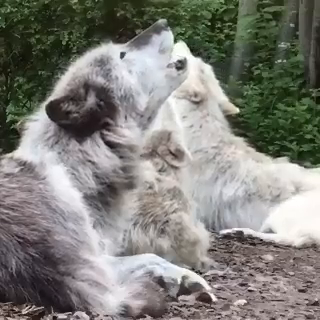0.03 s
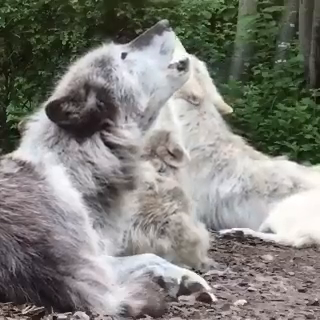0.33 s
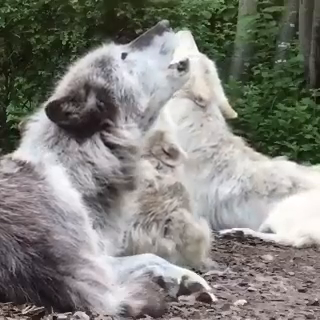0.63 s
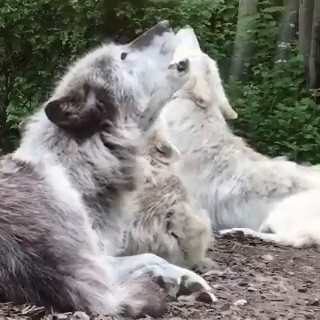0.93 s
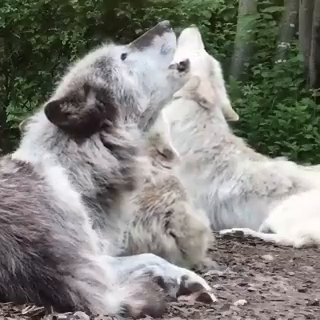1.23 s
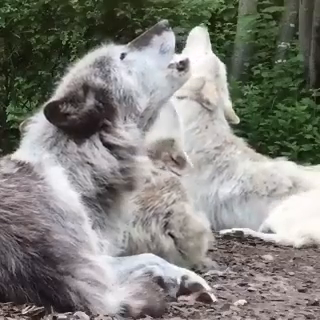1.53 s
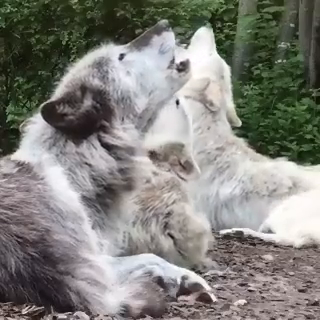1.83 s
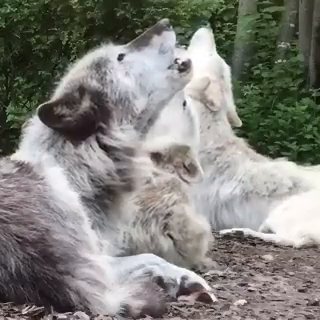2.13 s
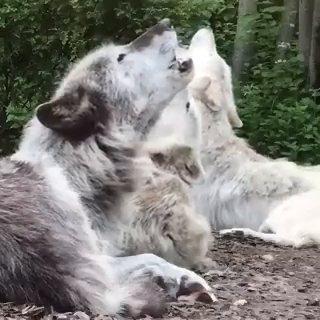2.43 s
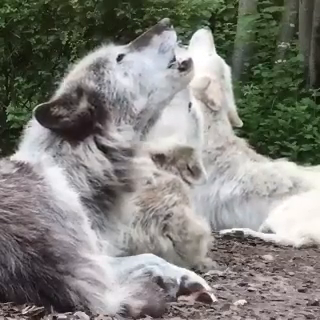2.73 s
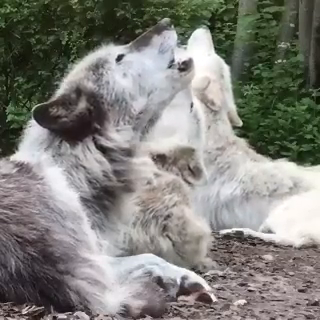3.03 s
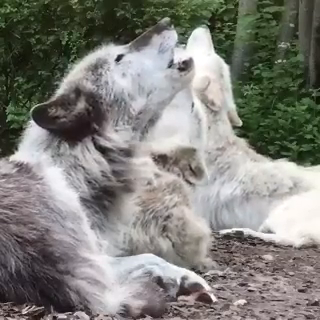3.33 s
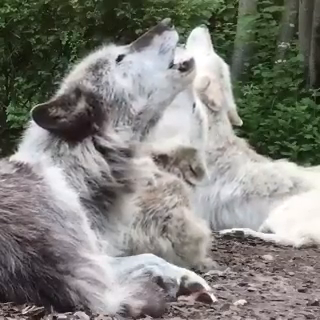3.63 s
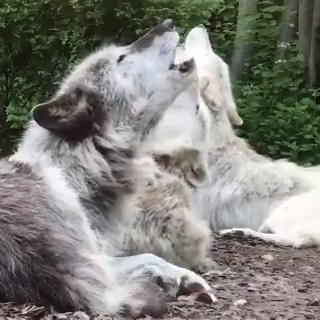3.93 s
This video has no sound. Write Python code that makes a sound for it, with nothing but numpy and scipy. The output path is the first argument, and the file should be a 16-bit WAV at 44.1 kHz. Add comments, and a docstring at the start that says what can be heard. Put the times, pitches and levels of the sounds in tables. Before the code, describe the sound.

Wolves howl together in long overlapping notes, with faint birds in the forest behind.

```python
"""Three wolves howl at a forest edge. From the start one holds a middle note; a second is hoarse, its vocal
folds repeating every third cycle, and breaks into a thin high note at 0.6 s. At 1.3 s the nearest joins
with a rough yelp, gets loud enough to clip and slides down. From 2.7 s a faint fourth howl echoes from
the trees. Behind them: forest air, soft ground bumps at 0.4 and 3.2 s, and far birds from 1 s on."""
import sys
import numpy as np
from scipy import signal
from scipy.fft import rfft, irfft
from scipy.io import wavfile
from scipy.ndimage import uniform_filter1d

SR = 44100
rng = np.random.default_rng(int(sys.argv[2]) if len(sys.argv) > 2 else 0)


def to_wav(sig):
    """Store sig (one row per channel, or 1-D mono) as 16-bit WAV at the path in sys.argv[1].

    Samples outside -1..1 are clipped; the rate is SR.
    """
    pcm = np.clip(np.atleast_2d(sig), -1, 1) * 32767
    pcm = np.round(pcm).astype(np.int16)
    wavfile.write(sys.argv[1], SR, pcm.T)  # frames by channels


N = 176400
TIME = np.arange(N) / SR
TREBLE_EDGE_HZ = 9700


def amp(db):
    """Decibels to gain."""
    return 10 ** (np.asarray(db) / 20)


def unit(x):
    """Scale to rms 1."""
    return x / np.sqrt(np.mean(x ** 2) + 1e-20)


def curves(table):
    """Timed points to one smooth curve per value column."""
    times_s, *columns = np.transpose(table)
    return [uniform_filter1d(np.interp(TIME, times_s, c), size=500) for c in columns]


def colour(points, hz):
    """Interpolate over log frequency."""
    points_hz, values = np.transpose(points)
    return np.interp(np.log(hz + 1), np.log(points_hz), values)


def noise(gain):
    """Noise of rms 1, spectrum shaped by gain(hz)."""
    return unit(irfft(rfft(rng.standard_normal(N)) * gain(np.fft.rfftfreq(N, 1 / SR)), N))


def drift(rate_hz):
    """Random wander, rms 1, rolling off above rate_hz."""
    return noise(lambda hz: 1 / (1 + (hz / rate_hz) ** 2))


def burst(peak_s, length_s, centre_hz, width_hz, db):
    """Short swell of noise in one resonance."""
    swell = np.exp(-np.abs(2 * (TIME - peak_s) / length_s) ** 3)
    return amp(db) * swell * noise(lambda hz: 1 / (1 + (2 * (hz - centre_hz) / width_hz) ** 2 / 2) ** 2)


def whistle(hz, db, jitter):
    """One slightly unsteady partial."""
    return np.sqrt(2) * amp(db) * np.sin(2 * np.pi * np.cumsum(hz * (1 + jitter * drift(64))) / SR)


def low_pass(x, hz):
    """Steep band limit."""
    return signal.oaconvolve(x, signal.firwin(401, hz, window=("kaiser", 8), fs=SR)[None], "same")


def forest_air():
    """Steady, dull background noise."""
    # (frequency [Hz], relative density [dB])
    spectrum = [(20,-33.5),(48,-18.5),(70,-3.5),(105,4.5),(150,3.5),(220,-1),(400,-5.5),(900,7.5),(1500,-2.5),(2200,-17),(3500,-16),(4700,-27.5),(6000,-27.5),(7500,-31)]
    return amp(-39.5) * noise(lambda hz: amp(colour(spectrum, hz)))


def forest_echo(x, taps_per_s=1500, gap_s=.012):
    """Scattered echoes from trunks, each band dying at its own rate."""
    # (frequency [Hz], T60 [s])
    decay = [(200,0.97),(600,.9),(1500,0.89),(4000,0.37),(9000,0.93)]
    taps = rng.standard_normal(SR) * (rng.random(SR) < taps_per_s / SR) * (TIME[:SR] > gap_s)
    hz, age_s, bands = signal.stft(taps, SR, nperseg=256)
    fade = amp(-60 * age_s / colour(decay, hz)[:, None])
    tail = signal.istft(bands * fade, SR, nperseg=256)[1]
    return signal.fftconvolve(x, tail / np.linalg.norm(tail))[:N]


def birds():
    """Far chirps: short sine glides that warble and flicker."""
    # (start [s], length [s], start pitch [Hz], end pitch [Hz], relative level [dB])
    chirps = [(1.041,0.2,3570,3370,-49.5),(1.933,0.036,4913,5250,-47),(2.34,0.035,3203,2784,-42),(2.397,0.039,3500,2418,-40),(1.316,.04,5020,5400,-48.5),(2.837,0.03,4664,3580,-41.5),(2.857,0.034,3177,2833,-33.5),(2.893,0.15,3240,2966,-42),(3.018,0.06,3120,2470,-40),(3.076,0.036,4090,5100,-43.5),(3.105,0.048,2620,2845,-46),(3.126,0.12,6743,5800,-40.5),(3.42,0.048,2854,2790,-40),(3.547,0.1,3705,4194,-47),(3.737,0.047,2985,2858,-35.5),(3.741,0.098,4706,3596,-43.5),(3.855,0.027,2580,3372,-37.5),(3.865,0.14,3740,4310,-42)]
    song, warble = np.zeros(N), 1 + .018 * drift(120)
    for start_s, length_s, from_hz, to_hz, db in chirps:
        at = (TIME > start_s) & (TIME < start_s + length_s)
        progress = (TIME[at] - start_s) / length_s
        hz = (from_hz + (to_hz - from_hz) * progress) * warble[at]
        envelope = np.sqrt(2) * amp(db) * np.sin(np.pi * progress)
        song[at] += envelope * np.sin(2 * np.pi * np.cumsum(hz) / SR)
    flicker = unit(1 + .4 * drift(150))
    return song * flicker


def far_wolf():
    """Faint high howl: one sinking partial."""
    # (time [s], pitch [Hz], level [dB])
    contour = [(2.7,1268,-81.5),(2.93,1255,-35.5),(3.15,1238,-34.5),(3.45,1221,-40.5),(3.65,1146,-34),(4,1158,-42)]
    return whistle(*curves(contour), jitter=.009)


def ground_bumps():
    """Soft bumps and scuffs: low noise bursts."""
    # (peak time [s], length [s], centre [Hz], width [Hz], level [dB])
    bumps = [(0.386,0.2,260,142,-41.5),(3.21,0.036,231,255,-48)]
    return sum(burst(*row) for row in bumps)


def throat_rush(tones):
    """Air rushing through the throats, following the rms of the howls."""
    # (frequency [Hz], relative density [dB])
    spectrum = [(100,-36),(280,-13),(450,0.5),(750,-1.5),(1200,1.5),(1600,-10),(2100,-15),(3200,-22.5),(4800,-32),(9000,-46)]
    effort = np.sqrt(np.abs(uniform_filter1d(tones ** 2, size=2000)))
    return amp(-30.5) * effort * noise(lambda hz: amp(colour(spectrum, hz)))


def throat_rasps():
    """Rasp and hiss where a voice turns chaotic."""
    # (peak time [s], length [s], centre [Hz], width [Hz], level [dB])
    rasps = [(0.011,0.15,758,70.5,-13),(0.142,0.04,738,40,-15),(0.294,0.28,743,121.4,-38.5),(.25,0.63,5490,390,-55.5),(0.257,.75,3924,140,-53),(0.6,0.061,755,127.4,-28.5),(1.366,0.073,564.8,129.4,-12),(1.378,.1,726,121,-27),(1.362,0.071,418,90,-30),(1.37,0.089,1345,600,-29.5),(1.48,.3,1650,898,-37.5),(1.552,0.077,700,162.2,-17.5),(1.601,0.056,820.8,60.3,-21.5)]
    return sum(burst(*row) for row in rasps)


def howl(hz, db, octave_db, throat, jitter, shimmer, bright_db=0, hoarse=(), hoarse_colour=None):
    """Near-pure voice: (tone, overtones). When hoarse, the folds repeat only every few cycles."""
    phase = 2 * np.pi * (np.cumsum(hz * (1 + jitter * drift(45))) / SR + rng.random())
    tone, overtones = np.sin(phase), np.zeros(N)
    flutter_db, flutter_hz = 4, 6
    for k in range(2, 21):
        if k == 2:
            partial_db = octave_db
        else:
            partial_db = colour(throat, k * hz) + bright_db + flutter_db * drift(flutter_hz)
        partial = np.sin(k * phase + 2 * np.pi * rng.random())
        overtones += amp(partial_db) * (k * hz < TREBLE_EDGE_HZ) * partial
    for start_s, end_s, cycles, hoarse_db in hoarse:
        gate = amp(hoarse_db) * np.clip(np.minimum(TIME - start_s, end_s - TIME) / .03 + .5, 0, 1)
        at = gate > 0
        for k in range(1, 12):
            if k % cycles or k > 2 * cycles:  # subharmonic series, minus fundamental and octave
                partial = np.sin(k / cycles * phase[at] + 2 * np.pi * rng.random())
                tone[at] += gate[at] * amp(colour(hoarse_colour, hz[at] * k / cycles)) * partial
    return np.sqrt(2) * amp(db) * (1 + shimmer * drift(35)) * np.array([tone, overtones])


def steady_wolf():
    """Clean middle note that steps up near 1.7 s."""
    # (time [s], pitch [Hz])
    pitch = [(0,566.7),(.15,551.5),(.5,527.7),(.7,508),(.97,509.4),(1.12,518.3),(1.33,520.5),(1.45,513),(1.56,511),(1.68,545.5),(1.85,630),(2.04,649.5),(2.1,677),(2.16,650),(2.36,647),(2.57,600.5),(2.66,610.7),(3.06,550.5),(3.15,553.4),(3.35,599.4),(3.56,588),(3.76,611.5),(3.89,608),(4,595)]
    # (time [s], level [dB], octave [dB re fundamental])
    level = [(0,-16,-17),(.2,-17.5,-19),(.5,-15.5,-26),(.8,-17.5,-20),(1.3,-16,-23),(1.5,-18.5,-24),(1.65,-23,-9),(1.78,-29,-11.5),(1.83,-19.5,-27.5),(2.1,-17,-37.5),(2.4,-19.5,-29),(2.8,-18,-22.5),(3.1,-20,-12),(3.4,-18.5,-23.5),(3.65,-19.5,-15.5),(3.8,-21.5,-22),(4,-20,-25)]
    # upper partials (frequency [Hz], level [dB re fundamental])
    throat = [(1600,-45.5),(2700,-60.5),(3500,-47.5),(3700,-35.5),(3950,-41),(4800,-75.5),(5500,-50),(6200,-65.5),(9200,-72)]
    return howl(*curves(pitch), *curves(level), throat, jitter=.0025, shimmer=.075)


def high_wolf():
    """Hoarse note breaking upward into a thin, wavering one; brighter as pitch rises."""
    # (time [s], pitch [Hz])
    pitch = [(0,704),(.33,660.4),(.48,661),(.595,700),(.65,870),(.71,872),(.78,933),(.905,975),(1.02,964),(1.11,992.5),(1.36,1002),(1.59,972),(1.74,1051),(1.87,1050),(2.04,995),(2.26,954),(2.33,1018),(2.46,956.6),(2.76,919),(3.08,932),(3.46,987),(3.59,947),(3.86,951.5),(3.97,861)]
    # (time [s], level [dB])
    level = [(0,-20.5),(.3,-22.5),(.52,-23),(.585,-16),(.64,-26.5),(.73,-30.5),(.82,-26.5),(1.15,-24.5),(1.6,-23.5),(1.85,-24.5),(1.95,-24),(2.05,-26),(2.24,-27.5),(2.33,-24.5),(2.55,-28),(2.65,-22),(2.76,-27.5),(3.2,-24.5),(3.55,-25.5),(3.85,-22),(4,-28.5)]
    # overtones (frequency [Hz], relative level [dB])
    throat = [(1300,-34),(2000,-52),(2900,-39.5),(3800,-32.5),(4800,-55.5),(5700,-39.5),(6700,-61),(9200,-64.5)]
    # (start [s], end [s], repeat [cycles], relative level [dB])
    hoarse = [(-.1, .59, 3, 0)]
    # subharmonic series (frequency [Hz], gain [dB])
    hoarse_colour = [(220,-42.5),(440,0),(880,-21.5),(1100,-15.5),(1500,-32),(3000,-50.5)]
    hz, = curves(pitch)
    octave_db = colour(throat, 2 * hz)
    bright_db = 18 * np.log2(hz / np.median(hz))
    return howl(hz, *curves(level), octave_db, throat, jitter=.0045, shimmer=.19,
                bright_db=bright_db, hoarse=hoarse, hoarse_colour=hoarse_colour)


def near_wolf():
    """Hoarse yelp clearing into a loud nasal howl; mellower as pitch falls."""
    # (time [s], pitch [Hz])
    pitch = [(1.3,586),(1.35,564.2),(1.385,651.3),(1.415,626.3),(1.49,588.2),(1.55,611),(1.61,591.3),(1.64,577.2),(1.79,567.4),(1.95,516.9),(2.04,496.2),(2.12,499.7),(2.25,474),(2.35,471.3),(2.49,451.6),(2.66,455.4),(2.78,449.2),(2.97,426.3),(3.25,422),(3.56,409.4),(3.72,415.3),(4,427)]
    # (time [s], level before beats [dB], octave [dB re fundamental])
    level = [(1.285,-66.5,-36),(1.305,-15,-34),(1.35,-10,-23.5),(1.39,-19,-21),(1.43,-10.5,-14.5),(1.51,-8,-17.5),(1.53,-7,-28.5),(1.56,-7.5,-27.5),(1.58,-11.5,-30),(1.62,-13,-19.5),(1.635,-6,-26),(1.785,-6,-22),(1.89,-9.5,-29.5),(1.95,-6.5,-14),(2.03,-13.5,-23.5),(2.13,-13,-18),(2.21,-9,-22.5),(2.45,-10.5,-17.5),(2.66,-12,-18),(2.86,-7.5,-23),(3.1,-9,-32.5),(3.32,-7.5,-25.5),(3.85,-7.5,-28.5),(4,-10,-22)]
    # brief peaks as the near and steady howls beat together (time [s], half length [s], gain [dB])
    beat_peaks = [(1.535,.004,4.4),(1.558,.004,4.4),(1.641,.007,3.1),(1.666,.008,3.3),(1.702,.011,3.2),(1.783,.013,3.2)]
    # upper partials (frequency [Hz], relative level [dB])
    throat = [(1700,-41),(2050,-49.5),(3000,-49),(3600,-47.5),(4200,-57.5),(4800,-70),(9200,-66)]
    # (start [s], end [s], repeat [cycles], relative level [dB])
    hoarse = [(1.392, 1.533, 2, -15), (1.57, 1.628, 3, -11.5)]
    # subharmonic series (frequency [Hz], gain [dB])
    hoarse_colour = [(200,-27.5),(300,-9),(390,0),(780,8.5),(900,1),(1350,-15),(1490,-5),(1620,-17.5),(1790,-20),(2100,-22),(2600,-33.5)]
    # (time [s], fifth partial [dB], sixth partial [dB])
    nasal_level = [(1.55,-76.5,-69.5),(1.75,-56,-63.5),(1.95,-38.5,-57),(2.1,-52,-42.5),(2.25,-56.5,-48),(2.65,-50,-55.5),(3,-75.5,-72.5)]
    hz, = curves(pitch)
    db, octave_db = curves(level)
    fifth_db, sixth_db = curves(nasal_level)
    beat_db = sum(gain_db * np.exp(-((TIME - peak_s) / half_s) ** 4)
                  for peak_s, half_s, gain_db in beat_peaks)
    bright_db = 14 * np.log2(hz / hz.min()) - 3
    tone, overtones = howl(hz, db + beat_db, octave_db, throat, jitter=.0024, shimmer=.039,
                           bright_db=bright_db, hoarse=hoarse, hoarse_colour=hoarse_colour)
    nasal = whistle(5 * hz, fifth_db, jitter=.0022) + whistle(6 * hz, sixth_db, jitter=.0024)
    entry_s = level[0][0]
    return (TIME > entry_s) * np.array([tone, overtones + nasal])


def scene():
    """Mono mix of direct sound and forest echo; the far wolf is echo only."""
    high = high_wolf()
    tones, overtones = steady_wolf() + high + near_wolf()
    rush, rasps, bumps = throat_rush(tones), throat_rasps(), ground_bumps()
    song = birds()
    direct = forest_air() + amp(-1.5) * song + bumps + rush + rasps + overtones + tones
    wolf_send = amp(-25.5) * tones + amp(-23) * high[0] + amp(-6) * overtones + amp(-21) * rasps
    echo = forest_echo(wolf_send + amp(-1) * song + far_wolf())
    return (direct + echo)[None]


def record(dry):
    """Treble cut off above 9.7 kHz; the loudest peaks clip at full scale."""
    knee_sharpness, output_edge_hz = 50, 16000
    x = low_pass(dry, TREBLE_EDGE_HZ)
    clipped = x / (1 + np.abs(x) ** knee_sharpness) ** (1 / knee_sharpness)
    return low_pass(clipped, output_edge_hz)


dry = scene()
out = record(dry)
to_wav(out)
```